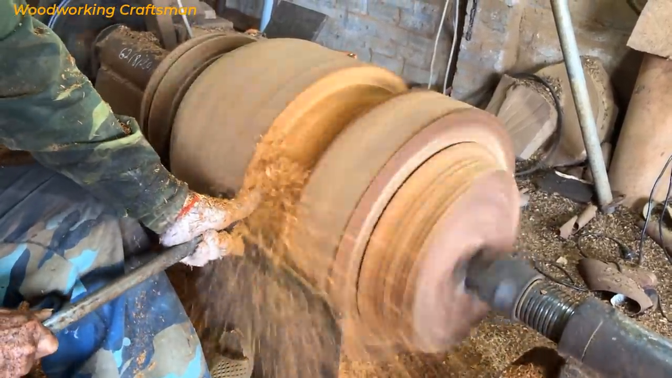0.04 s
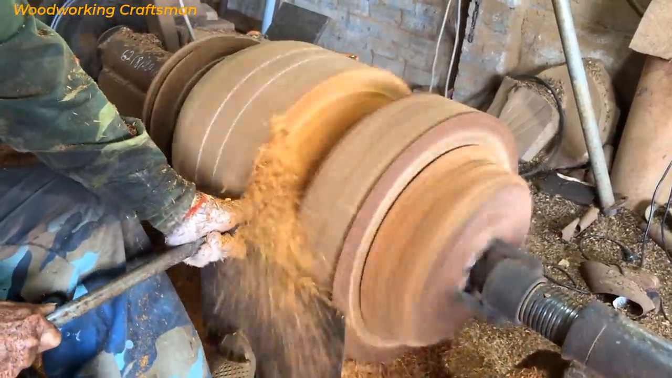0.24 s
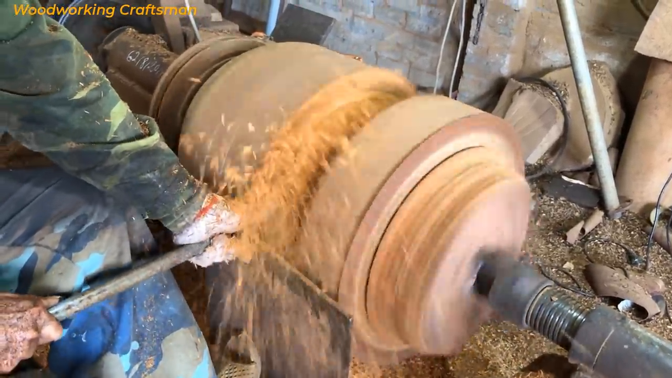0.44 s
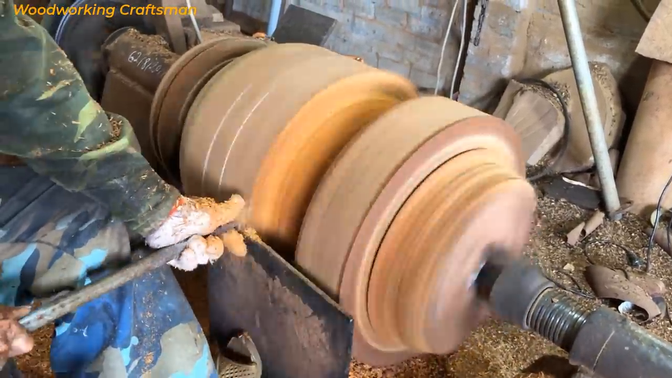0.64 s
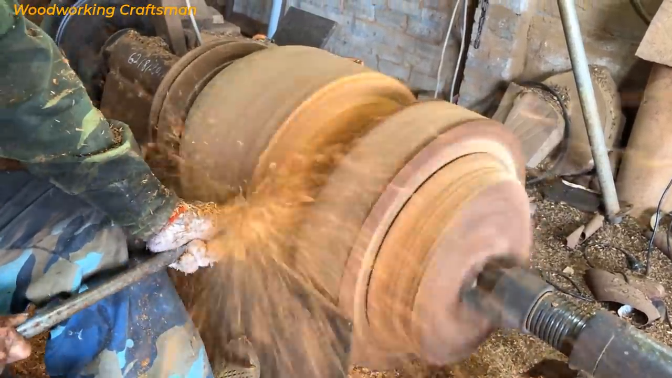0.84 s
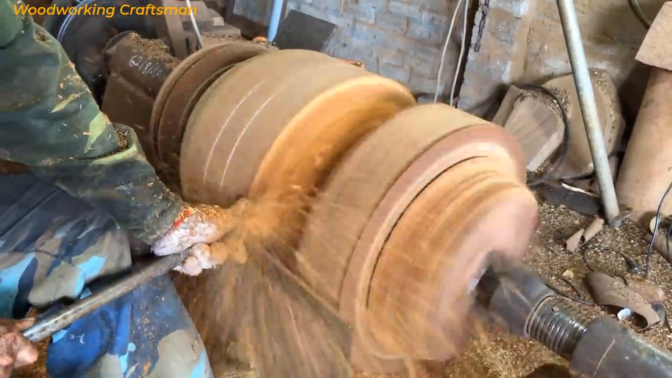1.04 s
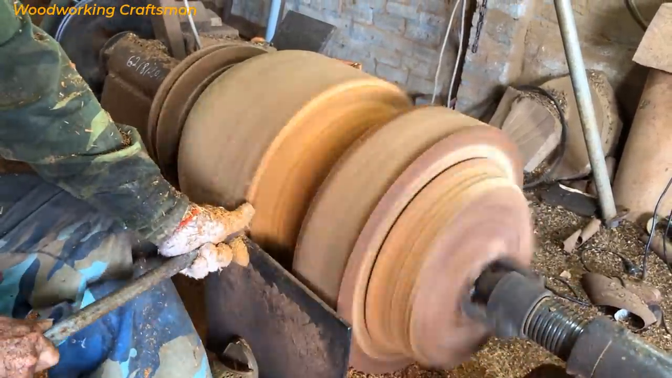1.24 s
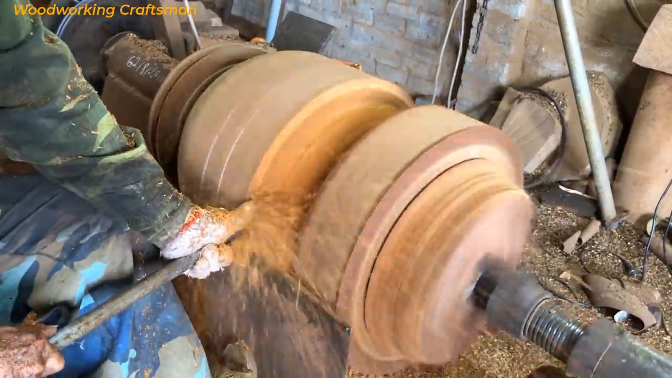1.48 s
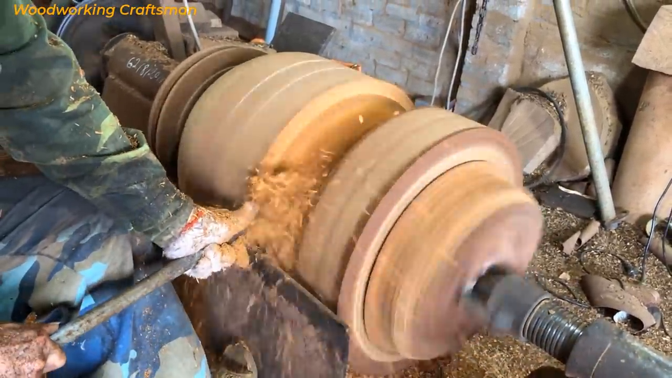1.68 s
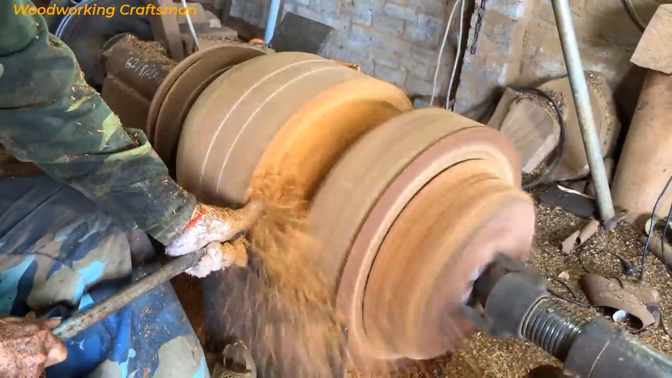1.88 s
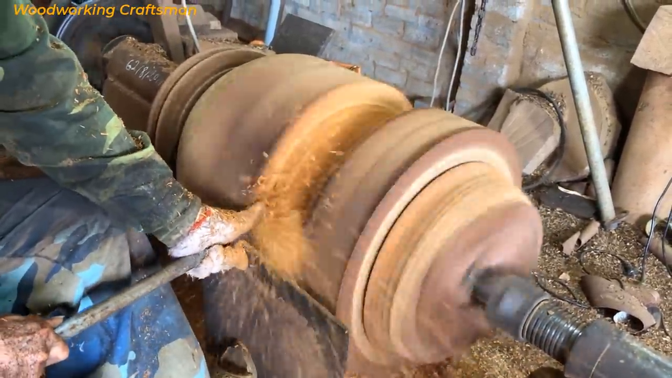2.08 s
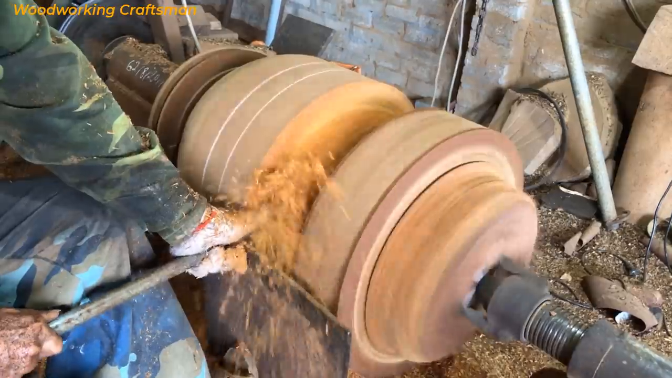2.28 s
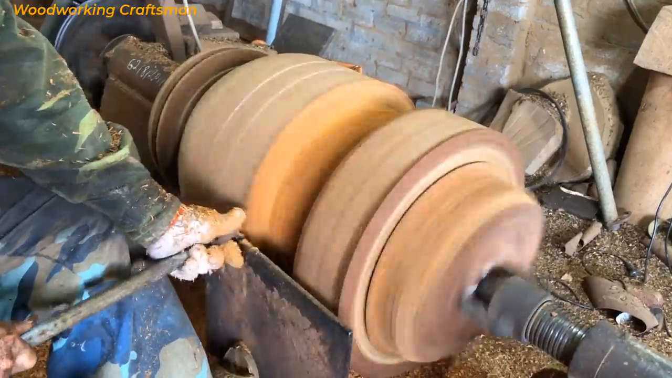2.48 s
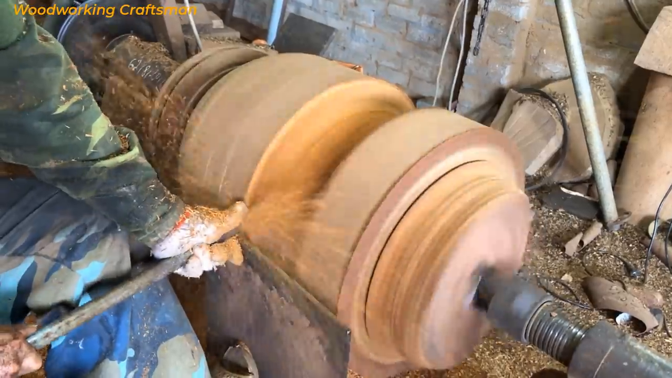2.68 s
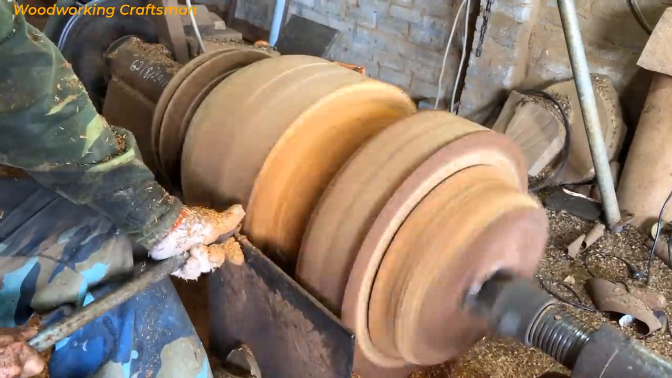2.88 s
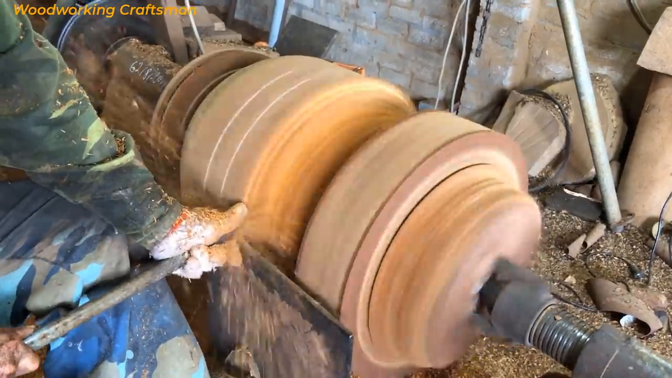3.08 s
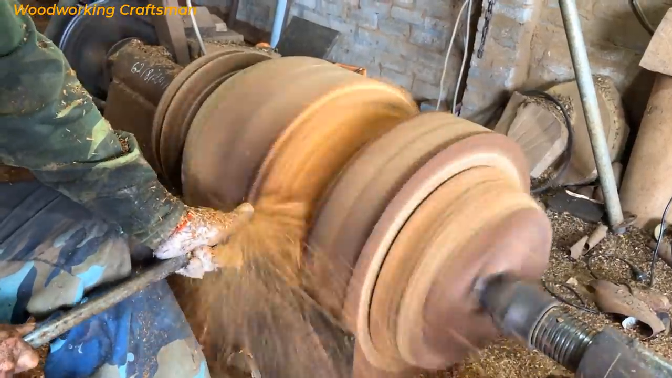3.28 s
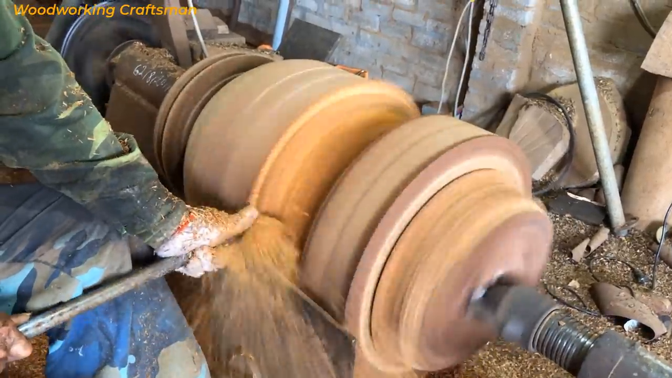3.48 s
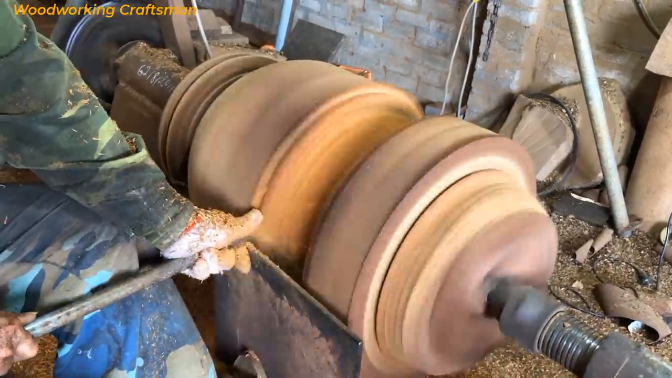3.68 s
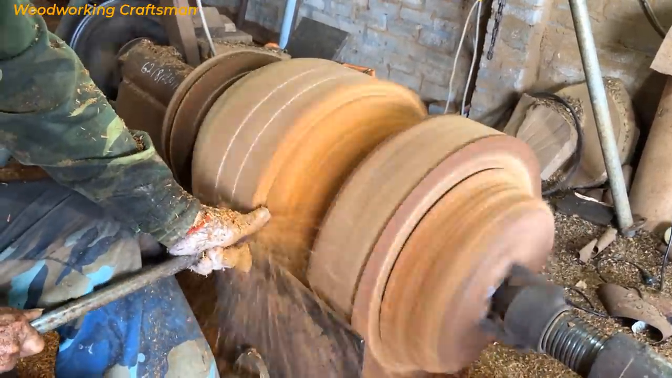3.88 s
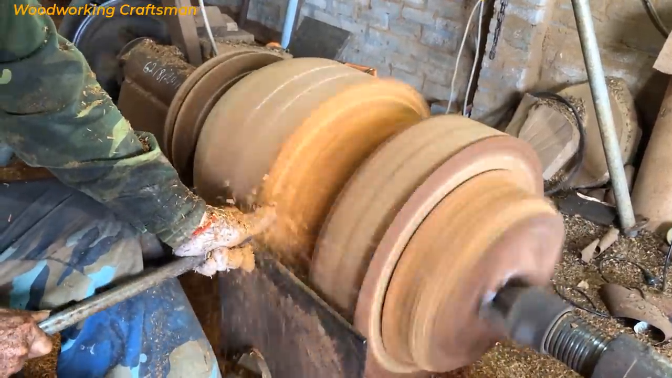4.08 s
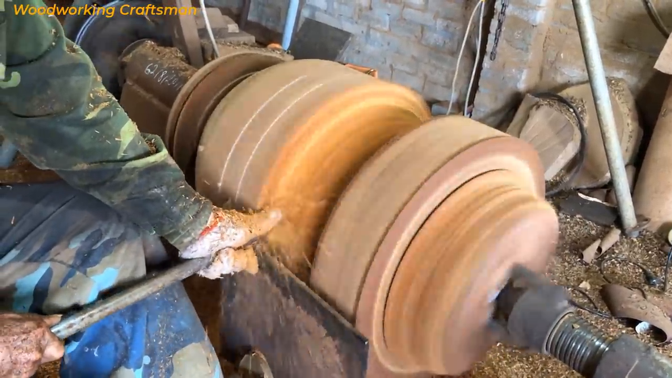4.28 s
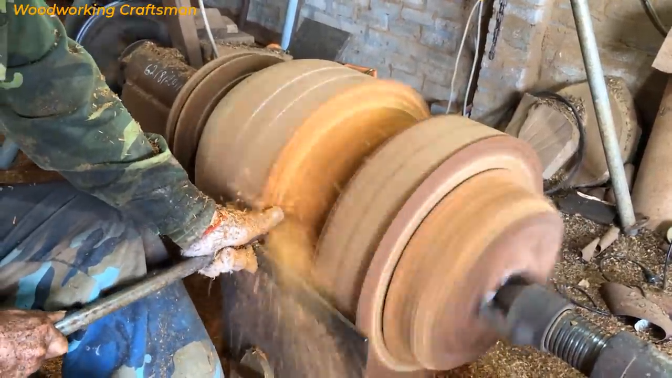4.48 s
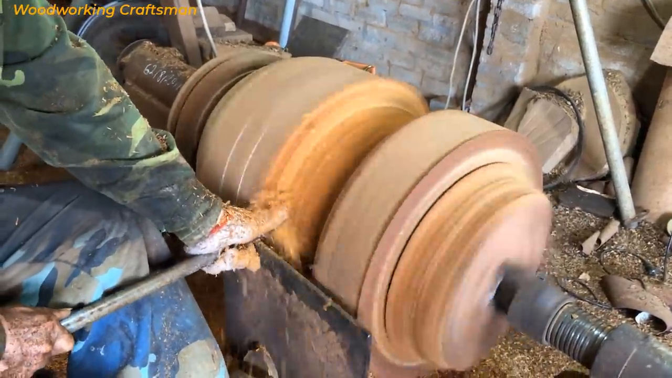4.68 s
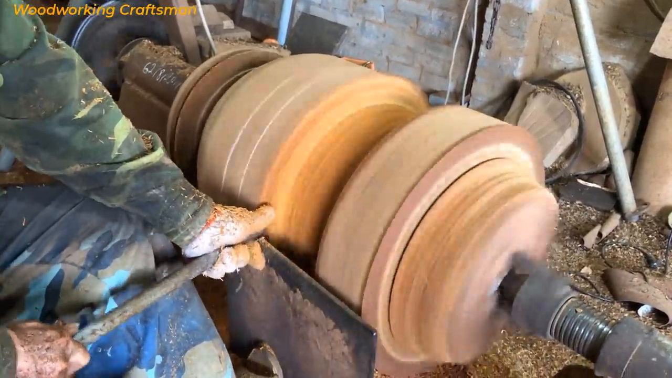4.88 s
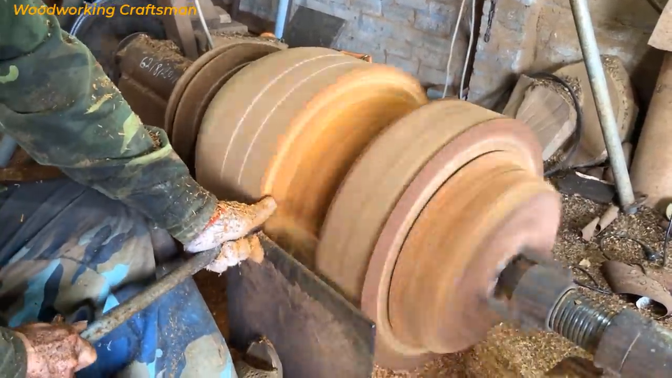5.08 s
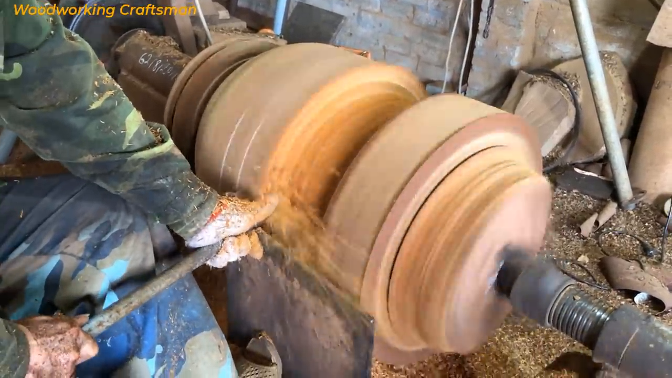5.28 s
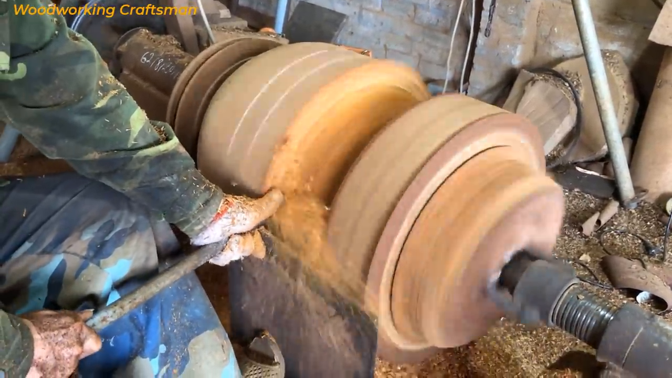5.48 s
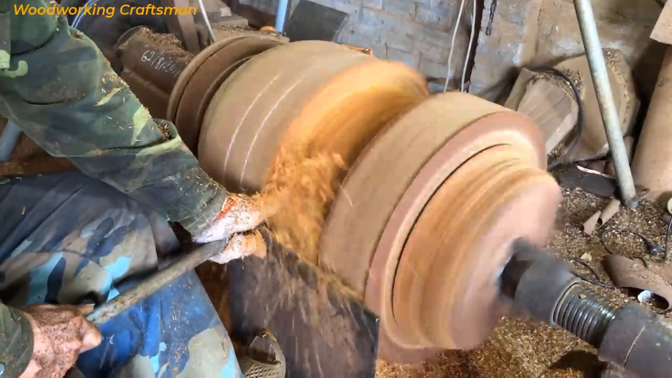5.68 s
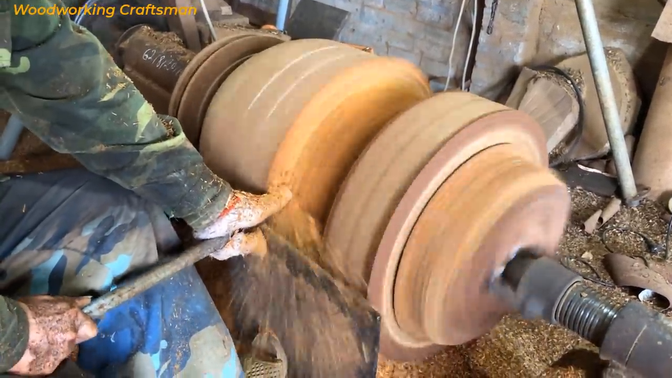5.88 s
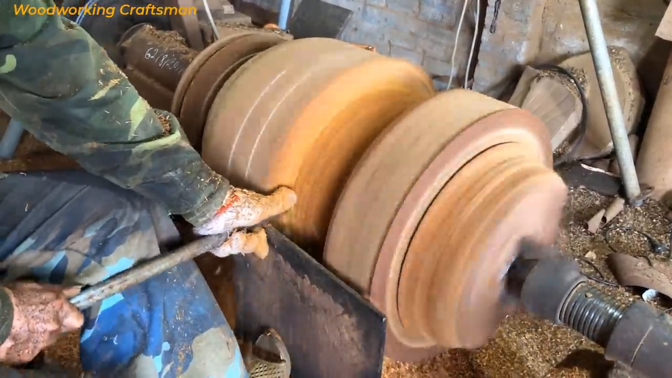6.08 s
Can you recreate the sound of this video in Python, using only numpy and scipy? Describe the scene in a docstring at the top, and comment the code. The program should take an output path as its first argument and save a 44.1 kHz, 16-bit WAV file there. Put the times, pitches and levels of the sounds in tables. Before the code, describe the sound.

A hand-held gouge cuts spinning wood on a lathe in bright, throbbing hisses, with shavings pattering close by over a low rumble.

```python
"""A bright, throbbing hiss: a hand-held gouge cuts a deep groove into a big block of wood on a lathe.
In each of seven passes the fibres tear, most often through resonances that sink as the edge works deeper,
and the grain throbs with the rotation. Clumps of flung shavings patter dully close to the microphone.
Underneath, the lathe rumbles on; the place is a small, cluttered workshop."""
import sys
import numpy as np
from scipy import signal
from scipy.fft import rfft, irfft
from scipy.io import wavfile
from scipy.ndimage import uniform_filter1d, minimum_filter1d

SR = 44100
rng = np.random.default_rng(int(sys.argv[2]) if len(sys.argv) > 2 else 0)


def store_pcm(level_fs):
    """Save levels as 16-bit WAV."""
    pcm = np.round(np.clip(level_fs, -1, 1) * 32767).astype(np.int16)
    wavfile.write(sys.argv[1], SR, np.atleast_2d(pcm).T)


N = 270774
TIME = np.arange(N) / SR
TOP_HZ = 15750  # upper edge of the sound

# passes of the gouge (start [s], end [s], attack [s], release [s], level [dB], moment of the push [s],
# extra force [dB], easing off over the next second [dB], fall of the ring over that second [Hz],
# top sizzle at the push [dB], top sizzle at the end [dB], chatter by the end [dB])
PASSES = [(-.6, .584, .05, .012, -19.5, -.35, 5.1, 3, 4250, -1.5, -1, 0),
          (0.719, 1.223, .11, .055, -21.5, .85, .2, 4, 0, -4, -5, 1.3),
          (1.33, 2.472, 0.045, .05, -20.2, 1.67, 5, 5, 4754, -1, -.5, 1),
          (2.613, 2.905, 0.083, .065, -25, 2.5, 2, 6, 300, -3.5, -6, 1),
          (2.958, 3.64, 0.05, 0.029, -20.4, 3.43, 2.8, 8, 300, -3, 1.5, 0),
          (3.744, 4.856, .008, .02, -19.1, 3.95, 4.3, 8.5, 3550, 5, 13.5, 3.6),
          (5.016, 6.2, 0.067, .03, -19.8, 5.24, 4.7, 9.5, 4850, 6.5, -3, 0)]
# stream of loose shavings (time [s], level [dB])
SHAVING_STREAM = [(0, -44), (.36, -43.5), (.6, -50.5), (.79, -45.5), (.89, -37), (1.48, -36), (1.7, -37.5),
                  (2.32, -42.5), (2.8, -36), (3.28, -41.5), (3.5, -38.5), (3.95, -35), (4.43, -40),
                  (4.55, -58), (4.75, -41), (5.15, -43.5), (5.36, -51), (5.92, -38)]


def undb(db):
    """Decibels to gain."""
    return 10 ** (np.asarray(db) / 20)


def unit(x):
    """Scale to an rms of 1."""
    return x / np.sqrt(np.mean(x ** 2) + 1e-18)


def curve(rows, t=TIME, column=1):
    """One column of a table, joined by straight lines along its first column."""
    rows = np.asarray(rows)
    return np.interp(t, rows[:, 0], rows[:, column])


def spectrum_db(points, hz):
    """Level of a (frequency [Hz], level [dB]) spectrum at the given frequencies."""
    points = np.asarray(points)
    return np.interp(np.log(hz + 1), np.log(points[:, 0]), points[:, 1])


def peaks_db(modes, hz):
    """Summed bell-shaped resonances (centre [Hz], width [Hz], gain [dB])."""
    return sum(db * np.exp(-.5 * ((hz - centre) / width) ** 2) for centre, width, db in modes)


def colour(x, points, size=8192):
    """Causal filter with a (frequency [Hz], gain [dB]) response."""
    cepstrum = irfft(np.log(undb(spectrum_db(points, np.fft.rfftfreq(size, 1 / SR)))))
    response = irfft(np.exp(rfft(2 * cepstrum[:size // 2], size) - cepstrum[0]))
    return signal.oaconvolve(x, response)[:N]


def wander(rate):
    """Random drift with an rms of 1, turning rate times a second."""
    steps = rng.standard_normal(N)
    return unit(np.interp(TIME * rate, np.arange(N), steps))


def clicks(per_s, spread_db):
    """Sparse impulses of either sign and uneven size."""
    hit = rng.random(N) < per_s / SR
    return unit(hit * rng.choice([-1, 1], N) * undb(spread_db * rng.standard_normal(N)))


def plunge(t, start_hz=12270, sink_power=0.61, touch_sizzle_db=-1.5):
    """Ring pitch and top sizzle of the cut: after a push the gouge sinks in, fast at first."""
    ring_hz, sizzle_db = np.zeros(len(t)), np.zeros(len(t))
    for start, end, _, _, _, push, _, _, sink_hz, pushed_db, last_db, _ in PASSES:
        now = t >= start - .03
        ring_hz[now] = start_hz - sink_hz * np.clip(t[now] - push, 1e-9, 1) ** sink_power
        sizzle_db[now] = np.interp(t[now], (start, push, end), (touch_sizzle_db, pushed_db, last_db))
    return ring_hz, sizzle_db


def groove_depth(ring_hz, mouth_hz=13080, deep_hz=9280):
    """The lower the ring, the deeper the gouge sits in the groove: 0 at its mouth, 1 deep inside."""
    return np.clip((mouth_hz - ring_hz) / (mouth_hz - deep_hz), 0, 1.3)


def edge_force(grain_hz=19.5, chatter_hz=33.07, bite_s=0.0037, let_go_s=0.006, lean_s=0.11):
    """The edge touches, settles, is pushed in, eases off and lifts; it throbs, chatters and snags."""
    # the edge snags on the wood (time [s], level [dB], decay [s])
    snags = [(.72, -27.5, .006), (.736, -23, .004), (1.329, -18, 0.0072), (1.354, -19.5, .0087),
             (2.41, -21, .012), (2.662, -22, 0.0087), (3.734, -23, 0.0083), (3.751, -17, .011),
             (4.597, -16, .012), (5.057, -19, .014), (5.142, -10, 0.014), (6.092, -16, 0.028)]
    ring_hz, _ = plunge(TIME)
    # end grain meets the edge twice a turn
    throb_db = 0.94 * groove_depth(ring_hz) * np.cos(2 * np.pi * grain_hz * (TIME - 2.315))
    bounce = np.cos(2 * np.pi * chatter_hz * (TIME - 4.605))
    touch_db = -14.5 + 3.0 * wander(70)  # a light touch is weak and unsteady
    force = np.zeros(N)
    for start, end, attack_s, release_s, level_db, push, push_db, ease_db, *_, chatter_db in PASSES:
        contact = np.clip((TIME - start) / bite_s, 0, 1) * np.exp(-np.maximum(TIME - end, 0) / let_go_s)
        lightness = 1 - np.clip(np.minimum((TIME - start) / attack_s, (end - TIME) / release_s), 0, 1)
        lean_db = push_db * np.clip(1 + (TIME - push) / lean_s, 0, 1)
        lean_db -= ease_db * np.clip(TIME - push, 0, 1) ** 2
        progress = np.clip((TIME - start) / (end - start), 0, 1)
        shake_db = throb_db + chatter_db * progress ** 2 * bounce
        force += contact * undb(level_db + lean_db + lightness * touch_db + shake_db)
    for start, db, decay_s in snags:
        snag = (TIME >= start) * undb(db) * np.exp(-abs(TIME - start) / decay_s)
        force = np.maximum(force, snag)
    return force


def groove_resonance(fibres, waver=0.0058, shimmer_db=1.5, whistle_ratio=0.7605, whistle_width_hz=810):
    """Gouge and groove colour the tearing with steady and sinking resonances, at constant power."""
    # hiss of tearing fibres (frequency [Hz], level [dB])
    tearing = [(100, -42), (300, -20), (1400, -23), (2600, -22.5), (3100, -20.5), (4500, -6), (6000, -15.5),
               (8500, -9.5), (10500, -6), (13000, -0.1), (15500, 0)]
    # resonances of gouge and groove (centre [Hz], width [Hz], gain at the mouth [dB], deep inside [dB])
    steady_modes = [(900, 20, 11, -6), (1410, 81, 5, 12.5), (1970, 140, 2.5, 12), (3418, 283, 4, 14.5),
                    (3700, 70.0, 2, -1.5), (4098, 175, -0.5, 13.5), (4400, 76, -5, 7), (5295, 120, 12, 4),
                    (6030, 155, 8.5, 0.6), (6850, 130, 5, 9), (7210.0, 76, 6.5, 7.5), (7438, 188, 9.5, 10),
                    (8200, 90, 2, 6.5), (9286, 400, 2, 9), (9810, 274, 2, 8), (10420, 240, -1.5, 6.5),
                    (11150, 340, 3, 12), (11830, 110, 2, 7.5), (12720, 210, 6.5, 3), (13650, 210, 2, 4),
                    (14700, 150, 6, 2.5)]
    # notches and resonances that sink with the ring (multiple of its pitch, width [Hz], gain [dB])
    sinking_modes = [(0.391, 704, -7), (1.059, 610, 7.5), (1.22, 500, -1.5), (1.86, 380, 7.5)]
    # colour of the cut along the groove (ring pitch [Hz], top sizzle [dB], whistle gain [dB])
    groove_colour = [(8100, 3.5, 12.5), (8830, -5.5, 14), (9560, -2.5, 13.5), (10500, .5, 7.5),
                     (11800, 4, 3.5), (12350, -3.5, -0.5)]
    hz, t, frames = signal.stft(fibres, SR, nperseg=1024, noverlap=768)
    hz = hz[:, None]
    ring_hz, sizzle_db = plunge(t)
    sizzle_db += curve(groove_colour, ring_hz)
    whistle_db = curve(groove_colour, ring_hz, column=2)
    depth = groove_depth(ring_hz)
    ring_hz *= 1 + waver * np.interp(t, TIME, wander(22))
    modes = [(centre, width, mouth + depth * (deep - mouth))
             for centre, width, mouth, deep in steady_modes]
    modes += [(ratio * ring_hz, width, db) for ratio, width, db in sinking_modes]
    modes += [(whistle_ratio * ring_hz, whistle_width_hz, whistle_db)]
    top = np.clip((hz - 9000) / 6000, 0, 1)
    # narrow bands of the hiss swell and fade as the contact shifts
    shimmer = uniform_filter1d(rng.standard_normal(frames.shape), size=4, axis=0)
    shimmer = unit(uniform_filter1d(shimmer, size=14, axis=1))
    db = spectrum_db(tearing, hz) + peaks_db(modes, hz) + sizzle_db * top + shimmer_db * shimmer
    gain = undb(db) * (hz < TOP_HZ * 1.02)
    gain /= np.sqrt(np.mean(gain ** 2, axis=0))
    return signal.istft(frames * gain, SR, nperseg=1024, noverlap=768)[1][:N]


def gouge_cut(flutter_db=0.8, splinter_db=1.25, crackle_db=-5, split_hz=8500, top_swing=0.27):
    """Fibres tear in a dense, hissing crackle that follows the force on the edge."""
    load = edge_force() * unit(undb(flutter_db * wander(130)))
    fibres = unit(rng.standard_normal(N) + undb(crackle_db) * clicks(5000, spread_db=1))
    splintering = unit(undb(splinter_db * wander(800)))
    hiss = groove_resonance(fibres * splintering)
    top = signal.sosfiltfilt(signal.butter(4, split_hz, "high", fs=SR, output="sos"), hiss)
    # every jolt of the edge brightens the hiss, every slack moment dulls it
    jolt = np.clip(load / (uniform_filter1d(load, size=3500) + 1e-6), 0, 1.6)
    return load * (hiss - top + top * jolt ** top_swing)


def small_clumps(per_s=15, typical_s=.006, over_stream_db=6.5, scatter_db=3):
    """Small clumps land at uneven moments, following the stream's level, harder as the work goes on."""
    slots = np.arange(0, TIME[-1], 1 / per_s)
    when, level, length, hardness = rng.uniform(-0.98, 1, (len(slots), 4)).T
    times = np.clip(slots + .5 * when / per_s, 0, TIME[-1])
    level_db = curve(SHAVING_STREAM, times) + over_stream_db + scatter_db * level
    length_s = typical_s * 2 ** (.5 * length)
    hardness_db = np.interp(times, (0, TIME[-1]), (-2.5, 4.5)) + scatter_db * hardness
    return list(zip(times, level_db, length_s, hardness_db))


def shavings(clump_trim_db=-0.4, stream_trim_db=-2.0, patchy_db=4):
    """Close to the microphone, clumps land as quick volleys of impacts; loose shavings patter between."""
    # big clumps landing (time [s], level [dB], length [s], hardness [dB per octave])
    big_clumps = [(0.071, -31.5, 0.0066, 0), (.277, -17, 0.0093, 5), (.297, -22, .016, 1.5),
                  (0.851, -21.5, .022, -0.5), (0.921, -26.5, .012, -3.5), (.963, -23, 0.0054, -0.5),
                  (1.137, -20, 0.011, 1), (1.163, -20, 0.009, 3), (1.178, -20.5, 0.0083, -1),
                  (1.198, -24, 0.022, -1.5), (1.287, -24, 0.0085, -2.5), (1.319, -28, 0.012, -4.5),
                  (1.452, -25.5, 0.015, -13.5), (1.54, -18, .018, 5), (1.577, -19, 0.011, 2.5),
                  (1.653, -21.5, .014, 2.5), (1.781, -25.5, 0.026, -2.5), (1.824, -22.5, 0.0098, .5),
                  (1.845, -24.5, 0.0094, 0), (2.092, -28.5, .013, -0.5), (2.142, -27.5, .016, -3),
                  (2.224, -23.5, 0.0094, 0.5), (2.478, -29, 0.034, 4.5), (2.523, -30.5, 0.0052, .5),
                  (2.591, -29, 0.0058, 7.5), (2.714, -17, 0.013, 5), (2.842, -27.5, 0.021, -0.5),
                  (2.894, -23.5, .0075, 5), (2.926, -20, .0066, 6), (2.938, -23, 0.011, 1),
                  (2.996, -25, .008, -0.5), (3.154, -25.5, .018, 2), (3.343, -23.5, 0.015, 7.5),
                  (3.383, -24.5, 0.0079, -3), (3.408, -23.5, .014, 0), (3.426, -21.5, .008, 6.5),
                  (3.458, -23, 0.013, 3.5), (3.492, -22, 0.0099, 2), (3.509, -21, 0.0062, 3.5),
                  (3.76, -26.5, 0.02, 4), (3.826, -21.5, 0.0043, 4.5), (3.889, -25.5, 0.018, 4),
                  (3.936, -24, 0.0039, 4), (4.065, -27, .027, 5), (4.129, -28.5, .011, 2.5),
                  (4.266, -29, .012, 7), (4.297, -27, 0.01, 7), (4.4, -24.5, 0.017, 6.5),
                  (4.427, -27, 0.02, 4.5), (4.49, -27.5, .005, 3), (4.713, -25, 0.015, 3),
                  (4.768, -27, 0.0066, 7), (4.791, -27, .011, 3), (4.827, -27, 0.0067, 5.5),
                  (4.869, -30, .007, 4), (4.892, -30.5, .005, 1.5), (4.935, -27, 0.0087, 3.5),
                  (5.021, -27, 0.023, 2.5), (5.1, -28, 0.015, 3.5), (5.134, -25.5, 0.012, 1.5),
                  (5.235, -24.5, 0.026, 4), (5.66, -28.5, 0.0067, 4.5)]
    # dull thud of a landing shaving (frequency [Hz], level [dB])
    thud = [(40, -41), (90, -24.5), (160, -1.5), (260, 3.5), (700, 3.5), (1400, -2.5), (2100, -10),
            (3000, -16), (4200, -26.5), (8000, -35.5)]
    volley = colour(clicks(2400, spread_db=4.0), thud)
    clumps = np.zeros(N)
    for centre, db, length_s, hardness_db in big_clumps + small_clumps():
        span = slice(max(int((centre - .04) * SR), 0), int((centre + .04) * SR))
        # a dense core with a few stragglers before and after
        burst = volley[span] / (1 + abs(2 * (TIME[span] - centre) / length_s) ** 2.82)
        octaves = np.log2(np.clip(np.fft.rfftfreq(len(burst), 1 / SR), 260, 1800))
        tilt = undb(hardness_db * (octaves - octaves[0]))  # hard chips sound brighter
        burst = irfft(rfft(burst) * tilt, len(burst))
        clumps[span] += unit(burst) * undb(db + clump_trim_db) * np.sqrt(length_s * SR / len(burst))
    impacts = clicks(700, spread_db=2.5) * undb(patchy_db * wander(60))
    loose = unit(colour(impacts, thud))
    return clumps + loose * undb(curve(SHAVING_STREAM) + stream_trim_db)


def lathe(level_db=-44, waver_db=0.5):
    """The drive rumbles steadily through the resonances of its housing."""
    # running drive (frequency [Hz], level [dB])
    drive_spectrum = [(25, -18), (70, -25), (150, -0.5), (300, -2), (550, 2), (1100, -16), (1800, -2),
                      (3000, -4), (4200, -10), (7000, -13), (15000, -12.5)]
    # resonances of the housing (centre [Hz], width [Hz], gain [dB])
    housing_modes = [(229, 70, 6.5), (607, 26, 7), (895, 24, 19), (1274, 18, 14), (2410, 140, -0.5)]
    drive = colour(rng.standard_normal(N), drive_spectrum)
    housing = undb(peaks_db(housing_modes, np.fft.rfftfreq(N, 1 / SR)))
    rumble = unit(irfft(rfft(drive) * housing, N))
    return rumble * undb(level_db + waver_db * wander(29))


def edge_graze(level_db=-56, waver_db=1.4):
    """The edge grazes the wood: a faint, constant sizzle, uncovered between the passes."""
    # light touch of the edge (frequency [Hz], level [dB])
    graze_spectrum = [(10500, -24), (12000, -13), (12750, 4), (13500, -7), (15500, -20)]
    sizzle = unit(colour(rng.standard_normal(N), graze_spectrum))
    return sizzle * undb(level_db + waver_db * wander(40))


def workshop(direct, t60_s=0.2, wet_db=-16.5):
    """The direct sound plus the short, weak reverberation of a small, cluttered room."""
    # what the walls and the floor send back (frequency [Hz], gain [dB])
    reflection = [(100, 1), (1000, -3), (4000, 7.5), (8000, -1), (15000, -11)]
    t = TIME[:SR // 2]
    tail = rng.standard_normal(len(t)) * np.exp(-np.log(1000) * t / t60_s) * (t > .004)
    reverb = signal.fftconvolve(direct, tail / np.sqrt(np.sum(tail ** 2)))[:N]
    return direct + undb(wet_db) * colour(reverb, reflection)


def scene():
    """One microphone by the lathe: cut and shavings in the room, over the rumble and the graze."""
    return (workshop(gouge_cut() + shavings()) + lathe() + edge_graze())[None]


def record(dry, ceiling_db=-5.5):
    """Behind the microphone, a limiter holds the peaks down and a steep low-pass cuts the top."""
    needed_gain = np.minimum(1, undb(ceiling_db) / (abs(dry) + 1e-9))
    gain = uniform_filter1d(minimum_filter1d(needed_gain, size=130), size=130)
    return signal.sosfilt(signal.ellip(12, .2, 80, TOP_HZ, fs=SR, output="sos"), dry * gain)


dry = scene()
out = record(dry)
store_pcm(out)
```